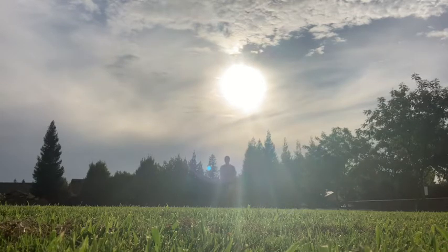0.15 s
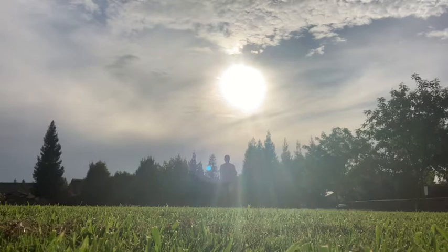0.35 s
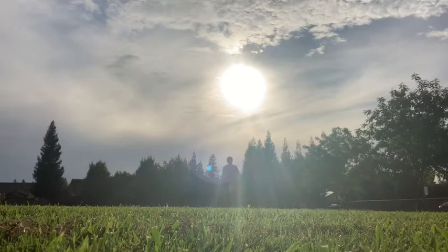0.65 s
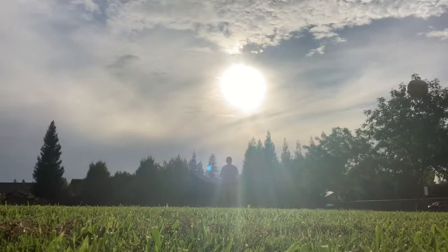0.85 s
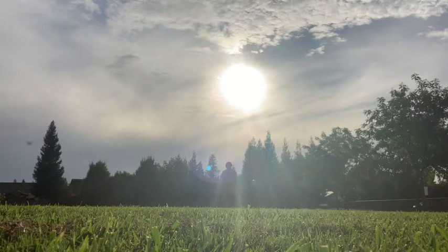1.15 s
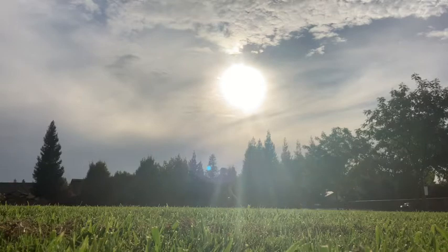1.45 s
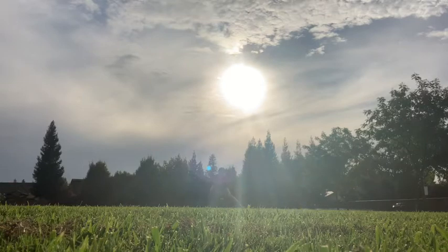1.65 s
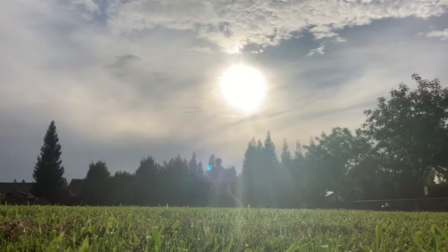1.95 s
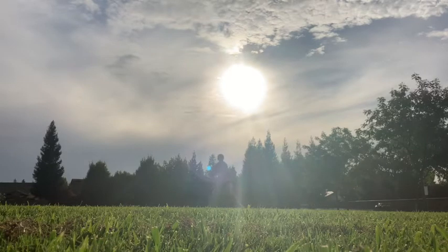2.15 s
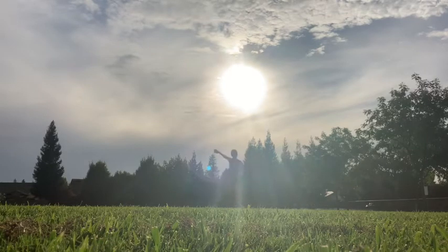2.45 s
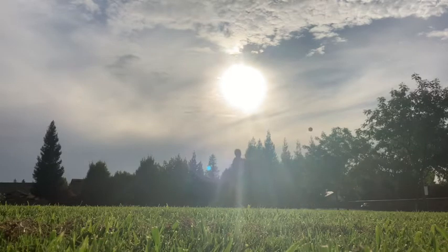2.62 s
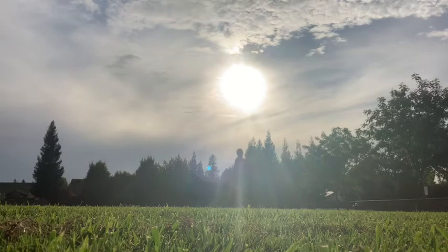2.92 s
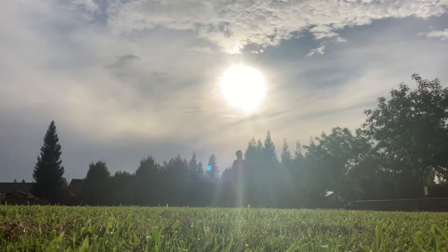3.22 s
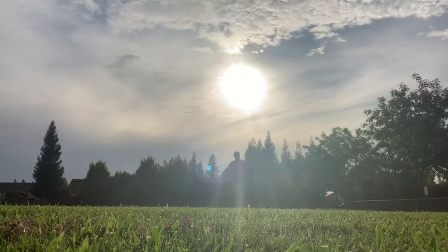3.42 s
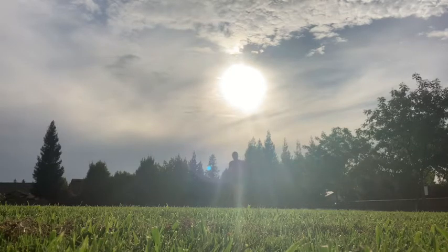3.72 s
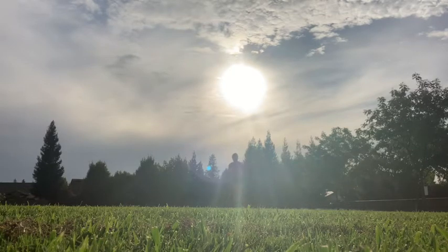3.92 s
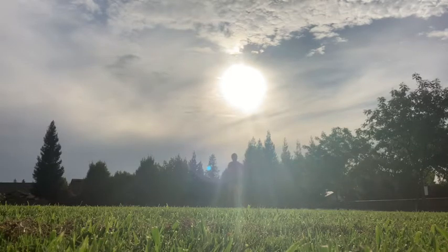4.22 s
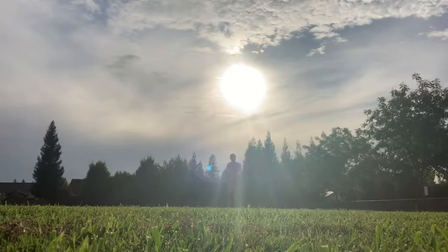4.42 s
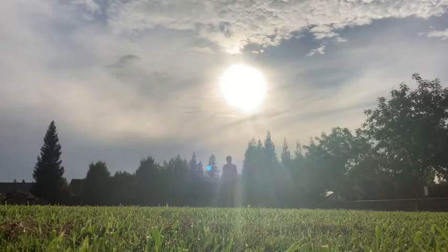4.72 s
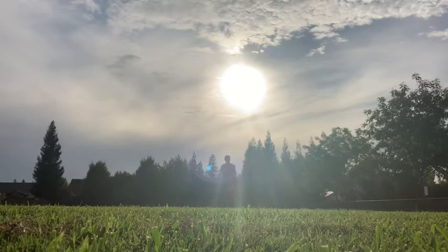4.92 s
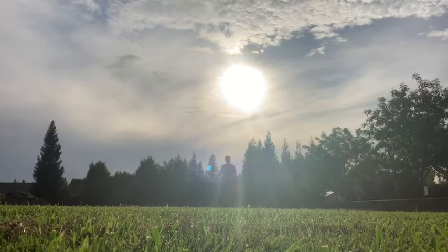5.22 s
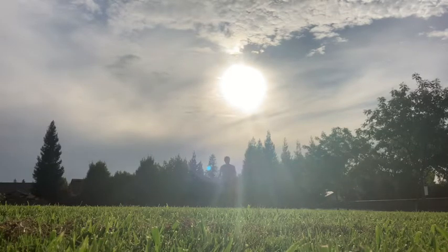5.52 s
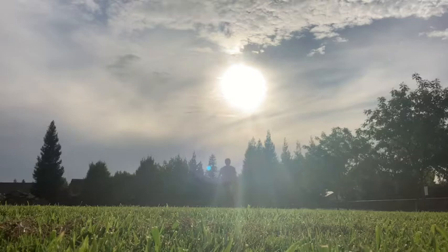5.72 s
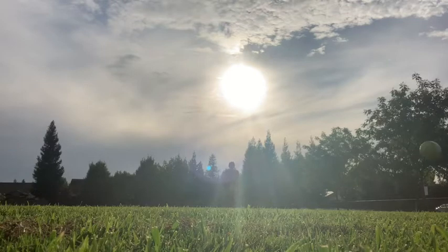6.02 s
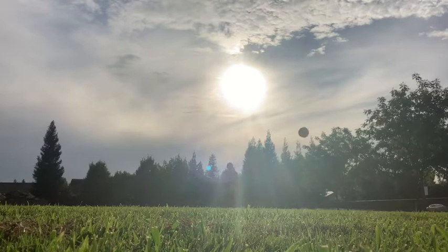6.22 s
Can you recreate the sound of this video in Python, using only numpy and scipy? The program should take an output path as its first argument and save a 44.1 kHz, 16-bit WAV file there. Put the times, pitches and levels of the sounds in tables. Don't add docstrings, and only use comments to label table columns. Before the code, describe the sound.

Low, steady far-off traffic with two faint wavering engine drones fills an outdoor field. A sharp metallic bat strike rings for a moment and returns as short scattered echoes. The ball bumps the turf twice, whips through leafy twigs with a sudden crackling rustle that thins away, and then a second brighter clink sounds, with a deep thump close behind. Heard in stereo from a low recorder lying in the grass, slightly overloaded on the peaks.

```python
import sys
import numpy as np
from scipy import signal
from scipy.fft import rfft, irfft, next_fast_len
from scipy.io import wavfile
from scipy.ndimage import uniform_filter1d

SR = 44100
rng = np.random.default_rng(int(sys.argv[2]) if len(sys.argv) > 2 else 0)


def voltage_ratio(level):
    return 10 ** (np.asarray(level, float) / 20)


def dump(signal):
    limited = np.clip(np.atleast_2d(signal).T, -1, 1)
    pcm = np.round(limited * 32767).astype(np.int16)
    wavfile.write(sys.argv[1], SR, pcm)


N = 280917
M = next_fast_len(N + 4096, True)
T = np.arange(N) / SR
BRIEF = np.arange(2 ** 15) / SR
HZ = np.fft.rfftfreq(M, 1 / SR)


def evened(x):
    return x / np.sqrt(np.mean(x ** 2) + 1e-20)


def read(points, hz):
    f, value = np.transpose(points)
    return np.interp(np.log(hz + 1), np.log(f + 1), value)


def coloured(x, points):
    hz = np.abs(np.fft.fftfreq(len(x), 1 / SR))
    gain = evened(voltage_ratio(read(points, hz)))
    causal = np.exp(np.conj(signal.hilbert(np.log(gain))))
    return np.fft.ifft(np.fft.fft(x) * causal).real


def dying(s, t60, t=BRIEF):
    return (t >= s) * voltage_ratio(-60 * np.abs(t - s) / t60)


def swelling(s, rise, t60, t):
    growth = np.clip(1 + (t - s) / rise, 0, 1) ** 2
    return growth * voltage_ratio(-60 * np.maximum(t - s, 0) / t60)


def slow(top_hz, count=24):
    hz, t = np.geomspace(top_hz / 20, top_hz, count), T[::64]
    wave = np.sin(2 * np.pi * (t[:, None] * hz + rng.random(count))) @ hz ** -.5
    return evened(np.interp(T, t, wave))


def resonate(x, hz, width):
    turn = np.exp(2j * np.pi * np.cumsum(hz * np.ones(N)) / SR)
    r = np.exp(-np.pi * width / SR)
    return 2 * (turn * signal.lfilter([1 - r], [1, -r], x / turn)).real


def grains(per_s, spread_db):
    size = voltage_ratio(spread_db * np.minimum(rng.exponential(1, M), 5)) * rng.standard_normal(M)
    return evened(size * (rng.random(M) < per_s / SR))[:N]


def modes(rows):
    return sum(voltage_ratio(db) * dying(0, t60) * np.sin(2 * np.pi * hz * BRIEF) for hz, db, t60 in rows)


def add(mix, s, sound):
    part = mix[round(s * SR):][:len(sound)]
    part += sound[:len(part)]


# (frequency [Hz], lead [radians])
BASS_PHASE = [(0, 0), (90, -.2), (130, -.35), (215, -1.3), (400, -2.3), (600, -2.7)]
TREBLE_PHASE = [(6000, -9.4), (7100, -6.5), (8100, -6), (9450, -3.1), (10900, -.2), (11900, .5),
                (13200, 3.1), (14600, 6.2), (16500, 6.4)]


def paired(left, right, pair):
    phase, balance = pair
    lead = np.interp(HZ, *np.transpose(BASS_PHASE + phase + TREBLE_PHASE))
    half = np.exp(.5j * lead) * voltage_ratio(read(balance, HZ) / 2)
    return np.array([rfft(left, M) * half, rfft(right, M) / half])


# (frequency [Hz], level [dB per Hz])
WASH = [(25, -27), (45, -7.5), (65, -3), (110, -5.5), (210, -4.5), (400, -6.5), (850, -11.5), (1400, -29),
        (1800, -38.5), (2300, -50.5), (3600, -52), (6500, -61), (14500, -66.5), (15800, -77.5)]
# (frequency [Hz], likeness [0-1])
LIKENESS = [(40, 0.7), (85, .95), (200, 1), (330, 0.56), (800, 0.93), (1300, .35), (2000, 0), (5000, 0.7),
            (7500, 0.5), (15000, 1)]
# (time [s], level [dB])
SWELL = [(0, .5), (1.1, 0), (1.6, -1.5), (2.8, -1), (3.5, 1), (5.2, .5), (6.37, 0.5)]
# (frequency [Hz], left over right [dB])
WASH_PAIR = [(1500, -3), (2600, -4.5)], [(60, 0), (110, 2.5), (200, 3.0), (380, 3.5), (700, 0.5), (1290, 2),
             (2380, 0.5), (4400, -1.0), (8120, -1), (15000, 1)]


def wash():
    frames, hz = N // 256 + 5, np.fft.rfftfreq(1024, 1 / SR)
    a, b, c, d, patches = rng.standard_normal((frames, 513, 5)).T
    patches = uniform_filter1d(patches, size=6, axis=0)
    patches = evened(uniform_filter1d(patches, size=14, axis=1))
    same = np.clip(read(LIKENESS, hz), 0, 1)[:, None]
    left = a + 1j * b
    right = same * left + np.sqrt(1 - same ** 2) * (c + 1j * d)
    z = np.array([left, right]) * voltage_ratio(1.7 * patches)
    white = evened(signal.istft(z, nperseg=1024, noverlap=768)[1][:, :N])
    swell = evened(voltage_ratio(np.interp(T, *np.transpose(SWELL))))
    colour = evened(voltage_ratio(read(WASH, HZ)))
    return voltage_ratio(-39.5) * colour * paired(*(swell * white), WASH_PAIR)


def drone(rows, rough, width_hz, waver_hz, flutter_db):
    s, hz, db = np.transpose(rows)
    hz = np.interp(T, s, hz) + waver_hz * slow(6)
    db = np.interp(T, s, db) + flutter_db * slow(14)
    tone = np.sqrt(2) * np.sin(2 * np.pi * np.cumsum(hz) / SR)
    fuzz = resonate(rng.standard_normal(N), hz, width_hz)
    fuzz = evened(resonate(fuzz, hz, width_hz))
    return voltage_ratio(db) * evened(tone + rough * fuzz)


# (time [s], pitch [Hz], level [dB])
LOW_DRONE = [(0.0, 78.71, -46.5), (0.82, 75.3, -53), (1.44, 76.2, -39), (2.2, 76.2, -42), (2.7, 72.22, -42),
             (2.78, 69.3, -70), (2.93, 75.13, -43.5), (3.34, 74.86, -50), (3.44, 78.55, -53),
             (3.53, 70.34, -50), (3.81, 72.87, -50), (3.9, 80.87, -52), (4.08, 70.73, -42.5),
             (4.59, 71.67, -45), (4.7, 70.36, -56), (5.04, 72.0, -46), (6.07, 71.7, -35.5),
             (6.37, 66.9, -40)]
HIGH_DRONE = [(0, 231.4, -46), (.95, 230, -43), (1.6, 226.8, -51.5), (2.2, 226.7, -46), (2.9, 224.1, -55),
              (3.7, 221, -40), (4.4, 222.5, -45.5), (5.0, 222.3, -50), (5.6, 222.7, -45.5),
              (6.37, 228, -53)]


def drones():
    low = drone(LOW_DRONE, rough=0.7, width_hz=22, waver_hz=1.5, flutter_db=2.0)
    high = drone(HIGH_DRONE, rough=0.99, width_hz=33, waver_hz=6, flutter_db=3.5)
    return low + voltage_ratio(-1.5) * high


# (time [s], level [dB], 60 dB decay [s])
SNAPS = [(0.949, -61, 0.14), (1.7012, -33.5, 0.0066), (1.694, -58, .02), (1.708, -45, .025),
         (1.7245, -56, 0.011), (1.733, -44.5, 0.015), (1.74, -63, 0.12), (2.456, -73.5, 0.13),
         (2.51, -80, 0.46), (5.895, -57, 0.12), (5.904, -41, 0.03)]
# (frequency [Hz], level [dB])
SNAP = [(1500, 0), (2500, -4), (3500, 3), (4300, -10), (5300, 1), (8000, -9), (11000, -7), (15500, -12)]


def turf():
    out, t = np.zeros(N), BRIEF[:8192] - .02
    for s, db, t60 in SNAPS:
        burst = dying(0, t60, t) * rng.standard_normal(len(t))
        add(out, s + t[0], voltage_ratio(db) * coloured(burst, SNAP))
    return out


# (time [s], peak [dB], share of dull patter [dB])
TWIGS = [(3.1957, -34, -17), (3.23, -22.5, -11), (3.2389, -17.5, -32), (3.2598, -21.5, -18),
         (3.2814, -22, -37), (3.3101, -36.5, -17), (3.364, -61, -10), (3.394, -50, -6), (3.4284, -48, -5),
         (3.467, -44.5, -30), (3.5049, -43.5, -20), (3.5633, -34.5, -27), (3.623, -56, -6),
         (3.6524, -43.5, -18), (3.713, -52, -19), (3.777, -53.5, -4.5), (3.849, -52, -19), (3.92, -66, -13),
         (3.932, -54.5, -16), (4.0004, -52, -11), (4.0447, -54, -18.5), (4.1292, -74, -14),
         (4.1544, -77, 10.5), (4.267, -82, -4), (4.3551, -65, -12), (4.4744, -71, -6), (4.5624, -69.5, 2)]
# (frequency [Hz], level [dB])
BUSH = [(400, -14.5), (900, 7.5), (1400, -15), (2300, -29), (3200, -7), (4000, -16.5), (5000, -15.5),
        (7500, -17.5), (9500, -13), (11500, -7.5), (13500, -10), (15500, -14.5)]
# (frequency [Hz], width [Hz], level [dB])
TAPS = [(4040, 590, -1), (4730, 2000, -2)]


def bush():
    entry_s, plunge_s, build_s = 3.195, 3.24, 0.25
    twig_rise_s, twig_t60, patter_t60 = 0.0027, .045, 0.2
    entered = T > entry_s
    whips = voltage_ratio(-38) * swelling(plunge_s, build_s, 1.11, T) * entered
    litter = voltage_ratio(-58) * swelling(plunge_s, build_s, 4.07, T) * entered
    clumps = uniform_filter1d(rng.standard_normal(N), size=300)
    clumps = voltage_ratio(1.4 * evened(clumps))
    for s, db, dull_db in TWIGS:
        whip = swelling(twig_rise_s, twig_rise_s, twig_t60, BRIEF[:8192])
        add(whips, s - .002, voltage_ratio(db - 5.5) * whip)
        fall = swelling(.003, 0.0033, patter_t60, BRIEF[:16384])
        add(litter, s, voltage_ratio(db + dull_db) * fall)
    hiss = whips * clumps * grains(per_s=22000.0, spread_db=-0.5)
    drops = clumps * grains(per_s=2700.0, spread_db=0.0)
    patter = np.zeros(N)
    for hz, width, db in TAPS:
        patter += voltage_ratio(db) * evened(resonate(resonate(drops, hz, width), hz, width))
    leaves = coloured(np.pad(hiss, (0, M - N)), BUSH)[:N]
    return leaves + voltage_ratio(-8.0 + 1.5 * slow(25)) * litter * patter


# (time [s], push [dB], pitch [Hz], length [cycles], left lead [radians])
THUDS = [(0.9567, -34.5, 1150, 4.4, 0.1), (0.958, -29, 610, 0.98, 1), (.962, -25, 327, 1.04, 0.5),
         (0.97, -33, 200, 1.9, -1.5), (1.704, -16.5, 718, 2.3, -1.6), (1.7102, -26.5, 325, 1.47, 0.5),
         (5.9052, -24.5, 1280, 2.8, -2.5), (5.9087, -25.5, 1780, 1.9, -2), (5.907, -20, 694, 1.46, -2),
         (5.9108, -5, 296, 1.48, -0.9), (5.925, -28, 146, 1.2, 1.5)]


def thuds():
    out, t = np.zeros((2, N)), BRIEF[:2048] - .02
    for s, db, hz, cycles, lead in THUDS:
        pan_db = -3 * np.log2(hz / 260)
        for port, side in zip(out, (.5, -.5)):
            push = np.exp(-(2 * t * hz / cycles) ** 2) * np.cos(2 * np.pi * hz * t + side * lead)
            add(port, s + t[0], voltage_ratio(db + side * pan_db) * push)
    return out


# (delay [s], level [dB], favoured pitch [Hz])
WALLS = [(.024, 9.5, 5400), (.066, 0.5, 6670), (.122, -3, 5550), (.143, 0, 5500), (.157, -13, 4300),
         (.177, 3, 6310), (0.191, -3, 5300), (.211, -8.5, 7550), (.246, -9.5, 5700), (.28, -14, 5800),
         (.3, -15, 3600), (.462, -29, 5300), (.49, -14, 6650), (0.51, -20, 3550)]
# (frequency [Hz], level [dB], 60 dB decay [s])
FAR = [(1440, -2.5, .08), (3570, -8, 0.06), (4150, -13, 0.033), (5300, 1, 0.03), (5540, -3, 0.025),
       (6270, -3, 0.029), (6630, -4.5, .02), (7830, -11.5, 0.03)]
# (delay [s], level [dB], rise [s], 60 dB decay [s])
GROVES = [(0.0032, 3, .002, .08), (0.019, 4.5, .012, 0.19), (.15, -4, .05, .5), (0.48, -23.5, .02, 0.41),
          (.4, -32.5, 0.12, 3)]
# (frequency [Hz], level [dB])
HAZE = [(1000, -9), (2400, -11.5), (3500, -8.5), (5300, -2.5), (7500, -6.5), (9000, -14.5), (12000, -18),
        (15500, -22)]


def field_returns():
    scatter = np.zeros(len(BRIEF))
    for at, db, rise, t60 in GROVES:
        scatter += voltage_ratio(db) * swelling(at, rise, t60, BRIEF)
    scatter *= rng.standard_normal(len(BRIEF))
    returns = voltage_ratio(-29) * signal.fftconvolve(scatter, modes(FAR)[:4096])[:len(BRIEF)]
    clicks = voltage_ratio(-7.0) * scatter
    onset = np.minimum(BRIEF[:4096] / .0015, 1)
    for delay, db, hz in WALLS:
        tap = voltage_ratio(db - 4.5) * rng.standard_normal(60) * np.hanning(60)
        favoured = [(f, d - 36 * abs(np.log(f / hz)), t60) for f, d, t60 in FAR]
        add(returns, delay, signal.fftconvolve(tap, modes(favoured)[:4096] * onset))
        clicks = clicks + voltage_ratio(db - 14) * rng.standard_normal(len(BRIEF)) * dying(delay, .03)
    return voltage_ratio(-48) * (returns + coloured(clicks, HAZE))


# (frequency [Hz], level [dB], 60 dB decay [s])
CLANG = [(3387, 5, 0.018), (1280, -5.5, 0.012), (5400, -17, 0.063)]


def bat(knock_db, crack_db, clang_db, flare_db, tube, crack):
    hit = voltage_ratio(crack_db) * rng.standard_normal(len(BRIEF)) * dying(0, 0.03)
    hit = hit - uniform_filter1d(hit, size=40)
    hit[0] += voltage_ratio(knock_db)
    released = 1 - np.exp(-(BRIEF / 0.0051) ** 2)
    flare = voltage_ratio(flare_db * np.exp(-(BRIEF / .0088) ** 6))
    ring = modes(tube[:2]) + modes(tube[2:]) * flare
    turned = np.exp(-(BRIEF / .072) ** 6)
    direct = coloured(hit, crack) + voltage_ratio(-15.5) * released * turned * ring + voltage_ratio(clang_db) * modes(CLANG)
    return direct + field_returns()


# (time [s], knock [dB], crack [dB], clang [dB], first flare of the ring [dB])
BLOWS = [
    (0.6586, 11, -11.5, -9.5, -2.5),
    (5.779, 11, -10, -18, 11.5),
]
# (frequency [Hz], level [dB], 60 dB decay [s])
TUBES = [
    [(1507, -4, 0.13), (2498, -12, 0.067), (3607, 0, 0.096), (4339, -36, 0.19), (5367, -23, 0.11), (6422, -30, 0.11), (7590, -44, 0.27)],
    [(1513, -4.5, 0.18), (2475, -6, 0.08), (3600, -3, 0.14), (4328, -18, 0.079), (5044, -23, 0.078), (5490, -12, 0.05), (6500, -15, 0.04), (7957, -31, 0.12)],
]
# (frequency [Hz], level [dB])
CRACKS = [
    [(120, -22.5), (300, -3.5), (700, 0.5), (950, -12.5), (1300, 0), (2000, -21), (3000, -8.5), (4200, -18.5), (6000, -15), (9000, -22.5), (11500, -18.5), (15500, -28.5)],
    [(120, -14), (300, -0.5), (700, 2.5), (950, -1.5), (1300, -1), (2000, -15), (3000, -5.5), (4200, -16.5), (6000, -9.5), (9000, -27), (11500, -26.5), (15500, -29.5)],
]


def swings():
    out = np.zeros(N)
    for (s, *levels), tube, crack in zip(BLOWS, TUBES, CRACKS):
        add(out, s, bat(*levels, tube, crack))
    return out


# (frequency [Hz], left over right [dB])
BAT_PAIR = [(1400, -2.5), (2150, -6.5), (3500, -4.5), (4300, -7.5)], [(100, -2.5), (250, 5), (700, -1),
            (1550, 13), (2000, 0.5), (2900, -4.5), (3700, -2), (4800, 7), (5600, -7), (9000, -0.66)]
BUSH_PAIR = [(1300, -3.4), (2000, -6), (3000, -2.9), (3600, -4.6), (4600, -6.4)], [(60, .8), (200, 2.5),
             (380, 2.1), (700, -.6), (2400, -1.5), (4400, -1.5), (5500, 0)]
# (frequency [Hz], lag [ms])
LAG = [(100, 6), (300, 4.2), (700, 2.5), (1500, 1), (3000, .5), (8000, 0)]


def scene():
    hum, leaves = drones(), bush()
    near = turf() + swings()
    ports = wash() + paired(hum, hum, WASH_PAIR)
    ports = ports + paired(leaves, leaves, BUSH_PAIR) + paired(near, near, BAT_PAIR)
    late = np.exp(-2j * np.pi * np.cumsum(read(LAG, HZ)) * HZ[1] / 1000)
    return irfft(ports * late, M)[:, :N] + thuds()


def low_pass(x):
    return signal.sosfilt(signal.butter(12, 16940, fs=SR, output="sos"), x)


def record(dry):
    edge_hz = 15900
    band = voltage_ratio(np.interp(HZ, [edge_hz - 200, edge_hz + 100], [0, -32]))
    soft = 1.1 * np.tanh(dry / 1.1)
    mix = irfft(rfft(soft, M) * band, M)[:, :N]
    return low_pass(mix)


dry = scene()
out = record(dry)
dump(out)
```